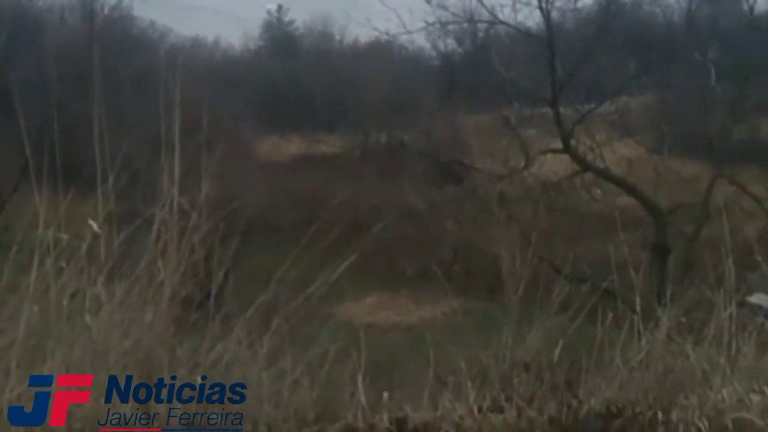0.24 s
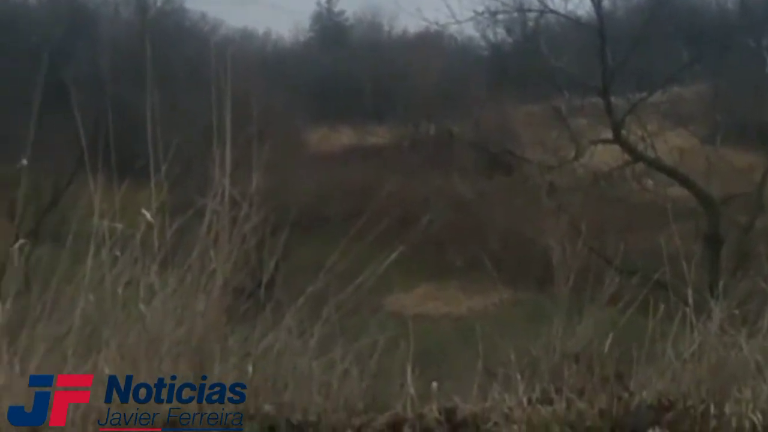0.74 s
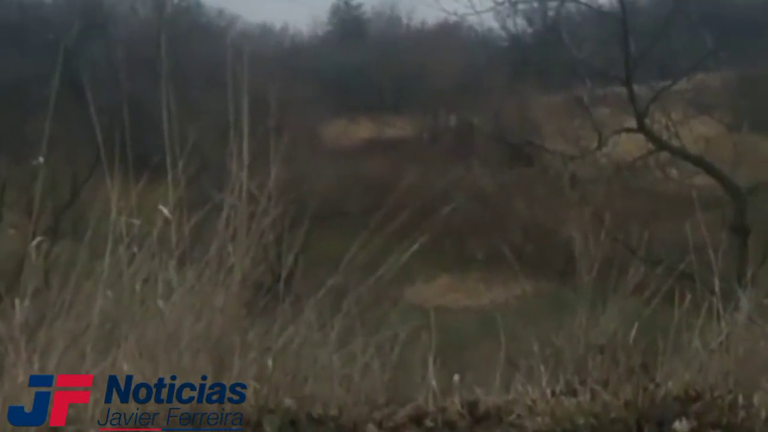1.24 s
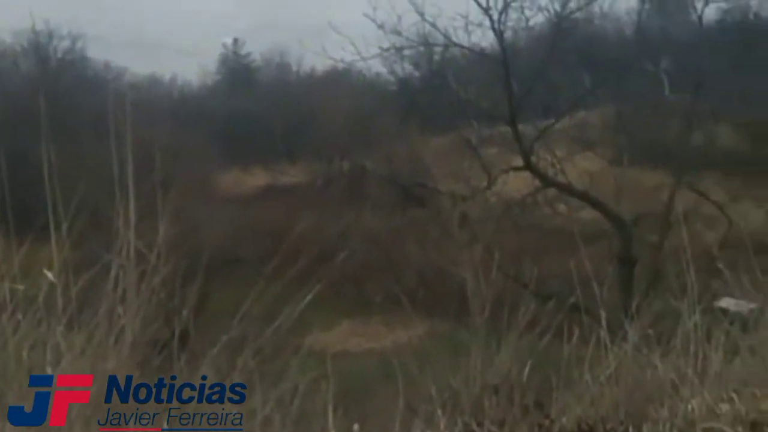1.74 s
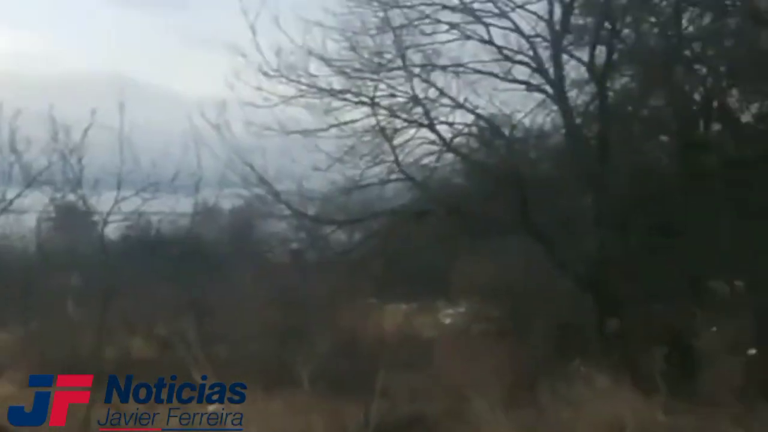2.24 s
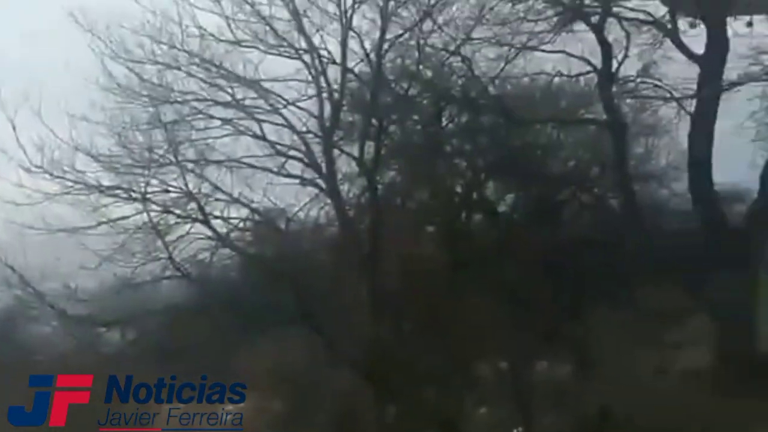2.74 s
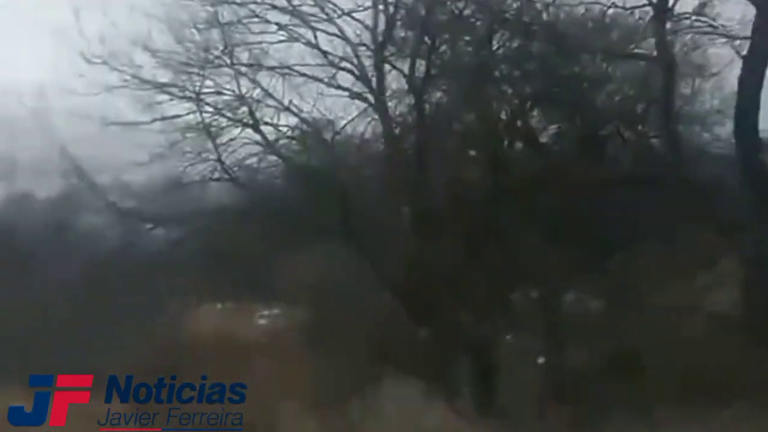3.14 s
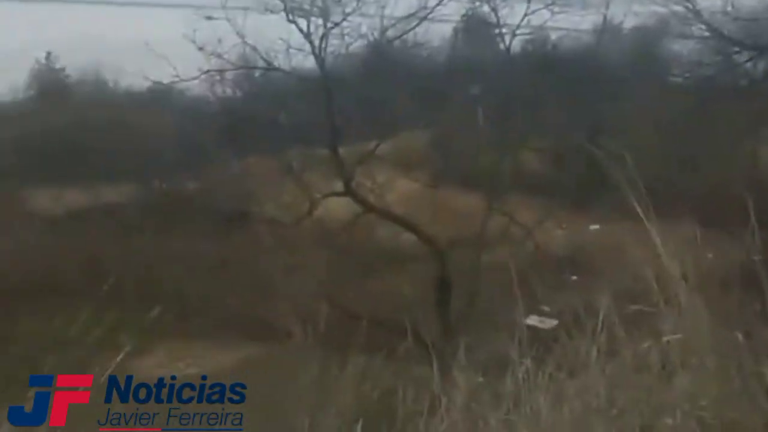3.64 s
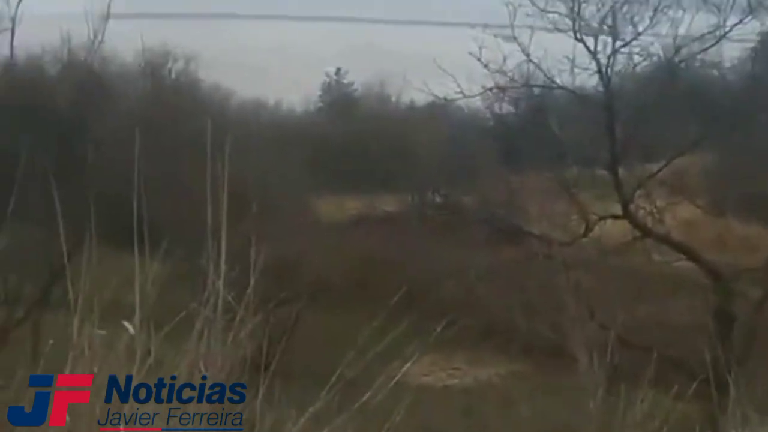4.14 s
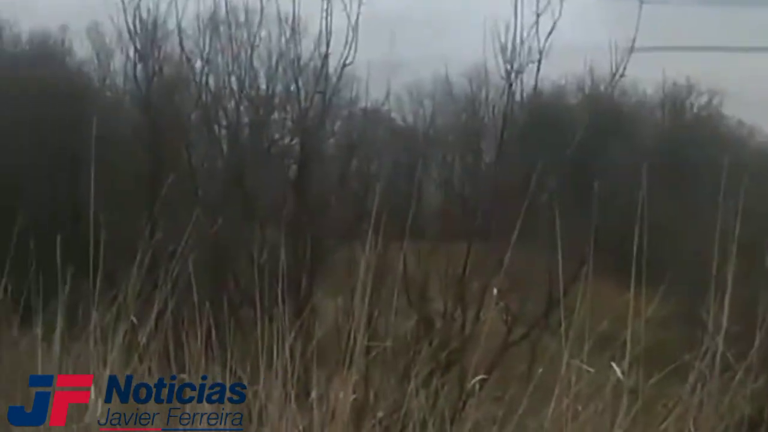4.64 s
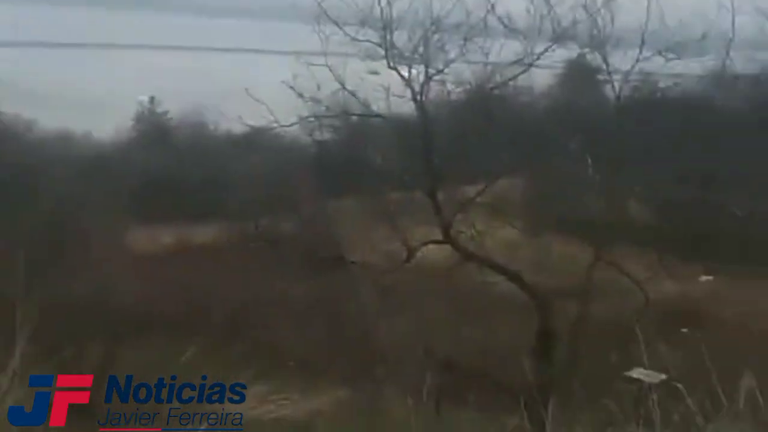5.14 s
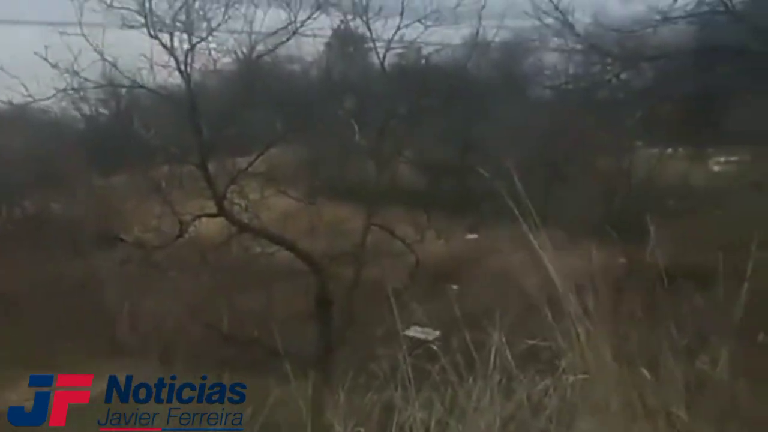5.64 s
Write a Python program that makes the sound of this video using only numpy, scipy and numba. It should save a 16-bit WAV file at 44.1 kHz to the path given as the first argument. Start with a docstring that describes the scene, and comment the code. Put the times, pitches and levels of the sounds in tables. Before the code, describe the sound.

A helicopter's main rotor slaps steadily and loudly, low over open scrubland, above a deep rumble. A nearer helicopter sweeps past in gusts of exhaust rush with a thin whine, its tail rotor buzzing and rattling as the hollow tone sinks. The rush then recedes, leaving the blade beat with sharp, uneven pops. A phone microphone slightly rounds off the loudest peaks.

```python
"""A helicopter's main rotor slaps steadily, low over scrubland, and the hillside repeats each slap.
Every blade gives a short sagging ring and a tip-vortex crack over a swelling rumble; some pop sharply.
A nearer helicopter sweeps past in gusts of exhaust rush, with hollow ground-reflection tones that sink
as it passes and a tail rotor that buzzes, rattles and chops the rush. Behind them sit a gearbox whine
and a few faint ticks, all heard through a phone that rounds off the loudest peaks."""
import sys
import numpy as np
from scipy import signal
from scipy.fft import rfft, irfft, next_fast_len
from scipy.io import wavfile
from scipy.ndimage import uniform_filter1d
from numba import njit

SR = 44100
rng = np.random.default_rng(int(sys.argv[2]) if len(sys.argv) > 2 else 0)


def to_wav(s):
    """Save 16-bit WAV."""
    ch = np.atleast_2d(s).T  # columns
    pcm = np.round(np.clip(ch, -1, 1) * 32767)  # PCM
    wavfile.write(sys.argv[1], SR, pcm.astype(np.int16))


N = 259308

# midrange colour of rushing air, for the exhaust wash and the blade crack: (frequency [Hz], gain [dB])
BODY_COLOUR = [(250, -14.5), (450, 6), (800, 6), (1100, -4.5), (1450, -9), (1800, -14), (2300, -31)]
# voice of the near helicopter: (time [s], hollow tone [Hz], second tone [Hz],
# second tone against the body [dB], tail buzz [dB], tail thump [dB])
NEAR_VOICE = [(0, 706, 1032, -6, -35, -22.5), (.4, 658, 1138, -12.5, -34, -58),
              (.7, 912, 1270, -11, -57, -25.5), (.86, 979, 1223, -7, -51, -27),
              (1.07, 811, 1296, -11.5, -53, -42), (1.12, 745, 1084, -3, -50, -43),
              (1.15, 799, 1243, -7, -50, -42), (1.2, 860, 1076, -3, -45, -37),
              (1.25, 721, 1204, -3.5, -41, -27), (1.29, 794, 1180, -4, -38, -28),
              (1.33, 878, 1227, -5.5, -32, -32), (1.39, 800, 1055, -9, -40, -30),
              (1.45, 767, 1013, -9, -47, -22), (1.53, 917, 1267, -17.5, -35, -33),
              (1.65, 783, 1240, -11, -26, -36), (1.82, 630, 1210, -11.5, -23.5, -40),
              (2, 601, 1205, -11.5, -19, -33.5), (2.2, 622, 1203, -9.5, -19, -38),
              (2.33, 620, 1176, -13, -17.5, -30.5), (2.45, 609, 1145, -8, -22, -25.5),
              (2.7, 521, 1010, -19.5, -24, -28.5), (2.82, 485, 1006, -13.5, -19, -28.5),
              (2.93, 467, 1018, -3, -16, -25), (3.1, 420, 942, -8, -20, -41.5),
              (3.5, 380.4, 858, -5.5, -21, -43.5), (4, 414, 910, -9, -21.5, -62),
              (4.6, 436, 837, -9.5, -25, -43.5), (4.95, 491, 880, -1, -48, -47.5),
              (5.15, 608, 916, -7.5, -42, -20.5), (5.88, 658, 1034, -16.5, -32, -30)]


def undb(db):
    """Decibels to amplitude."""
    return 10 ** (np.asarray(db) / 20)


def unit(x):
    """Scale to an rms of 1."""
    return x / np.sqrt(np.mean(x ** 2))


def curves(table):
    """The columns that follow a table's time column, one value a sample."""
    times, *columns = np.transpose(table)
    return [np.interp(np.arange(N) / SR, times, column) for column in columns]


def shape(x, points):
    """Colour x by (Hz, dB) points, cutting everything outside them."""
    size = next_fast_len(N)
    hz, db = np.transpose(points)
    bin_hz = np.arange(1, size // 2 + 2) * SR / size
    gain = undb(np.interp(np.log(bin_hz), np.log(hz), db, -120, -120))
    return irfft(rfft(x, size) * gain, size)[..., :N]


def spread(x, extra_db=0.):
    """Mid and side signals to left and right; the treble is widest."""
    # stereo width: (frequency [Hz], side against mid [dB])
    width = [(60, -40.5), (130, -39), (260, -28.5), (550, -23), (1200, -11.5), (2400, -6), (4000, -6.5),
             (11000, -2.5)]
    side = undb(extra_db) * shape(x[1], [(10, width[0][1])] + width + [(20000, width[-1][1])])
    return np.array([x[0] + side, x[0] - side])


def walk(rate):
    """Smooth random drift: levels held 1 / rate seconds and slewed twice."""
    hold = int(SR / rate)
    steps = np.repeat(rng.standard_normal(N // hold + 1), hold)
    return 2.17 * uniform_filter1d(uniform_filter1d(steps, hold), hold)[:N]


def noise(colour, flicker_db):
    """Coloured mid and side noise whose level flickers in the turbulent air."""
    return unit(shape(rng.standard_normal((2, N)), colour)) * undb(flicker_db * walk(12))


@njit
def bandpass(x, hz, width):
    """State-variable band-pass with a moving centre, gain 1 there; width is 1 / Q."""
    y, band, low = np.empty(len(x)), 0., 0.
    for i in range(len(x)):
        g = np.tan(np.pi * hz[i] / SR)
        v = (band + g * (x[i] - low)) / (1 + g * (g + width))
        band, low, y[i] = 2 * v - band, low + 2 * g * v, width * v
    return y


def hollow(hz, width):
    """Mid and side noise in one moving resonance; the air has taken its treble."""
    # treble lost over distance: (frequency [Hz], gain [dB])
    distance = [(10, 1), (1800, 1.5), (3500, -23.5), (6000, -37.5), (8000, -65)]
    dull = shape(rng.standard_normal((2, N)), distance)
    return unit(np.array([bandpass(bandpass(channel, hz, width), hz, width) for channel in dull]))


def via_ground(x, tone_hz, share):
    """Add a bounce that lags by one period of tone_hz: peaks at its multiples, notches between."""
    place = np.arange(N) - SR / tone_hz
    bounce = np.array([np.interp(place, np.arange(N), channel) for channel in x])
    return (x + share * bounce) / np.sqrt(1 + share ** 2)


def blades(t, blade_hz, scatter_db):
    """Seconds from the nearest blade passage, and a random strength for each passage."""
    count = t * blade_hz
    nearest = np.round(count).astype(int)
    strength = undb(scatter_db * rng.standard_normal(nearest.max() + 3))[nearest + 2]
    return (count - nearest) / blade_hz, uniform_filter1d(strength, size=200)


def pulse(age, hz):
    """A pressure peak between two troughs."""
    u = (np.pi * hz * age) ** 2
    return (1 - 2 * u) * np.exp(-u)


def ring(age, hz, decay_cycles):
    """A short ring that starts sharply and sags in pitch."""
    cycles = age * hz
    envelope = np.where(cycles < 0, np.exp(-(cycles / 0.42) ** 2), np.exp(-cycles / decay_cycles))
    sag = 1 - 0.18 * np.clip(cycles, -1, 4)
    return envelope * np.cos(2 * np.pi * cycles * sag)


def ticks():
    """Faint high ticks nearby: short bursts of narrow noise."""
    # one tick a row: (time [s], level [dB], pitch [Hz])
    bursts = [(3.4614, -48, 5750), (4.7686, -54, 5450), (5.7942, -66, 5530)]
    out, t = 0, np.arange(N) / SR
    for at, db, hz in bursts:
        gate = np.exp(-((t - at - .006) / 0.014) ** 2)
        band = shape(rng.standard_normal(N), [(0.89 * hz, -25), (hz, 0), (1.32 * hz, -25)])
        out = out + undb(db) * gate * unit(band)
    return out


def gearbox_whine():
    """A rasping band that narrows to a thin whine far off."""
    # the whine's glide: (time [s], pitch [Hz], level [dB])
    glide = [(.42, 2390, -64), (.53, 2390, -30), (.63, 2356, -23), (.715, 2430, -15.5), (.78, 2320, -30),
             (.85, 2585, -18), (.89, 2390, -42), (1.035, 2405, -52), (1.1, 2610, -25), (1.3, 2500, -27),
             (1.6, 2480, -38), (2.1, 2346, -42), (2.8, 2240, -53), (2.95, 2277, -39.5), (3.3, 2190, -58.5),
             (5.2, 2190, -55.5), (5.45, 2210, -54), (5.7, 2185, -48), (5.88, 2195, -52)]
    # broad rasp in the whine: (time [s], share of the power [0-1])
    rasp_share = [(0, 1), (3, .85), (5.2, .05), (5.88, .05)]
    hz, db = curves(glide)
    share = curves(rasp_share)[0]
    rasp, thin = hollow(hz, width=.2), hollow(hz, width=.03)
    return spread(undb(db) * (np.sqrt(share) * rasp + np.sqrt(1 - share) * thin))


def swish_lift(attack_s=0.0052):
    """Lift in dB that briefly brightens the rush: a quick rise, then a fade."""
    # one swish a row: (time [s], fade [s], treble lift [dB])
    swishes = [(1.326, 0.018, 3), (1.762, 0.041, 9), (2.708, 0.018, 12.5), (3.168, 0.012, 8),
               (3.289, 0.037, 11.5)]
    t = np.arange(N) / SR
    return sum(db * np.exp(-np.where(t < at, (at - t) / attack_s, (t - at) / fade_s) ** 2)
               for at, fade_s, db in swishes)


def exhaust_rush(wander=0.044):
    """Gusts of exhaust noise, hollowed by the ground reflection into tones that turbulence bends."""
    # the gusts: (time [s], hiss [dB], body [dB], treble [dB])
    gusts = [(0.0, -43, -29, -44), (0.08, -25.5, -18.5, -39), (0.13, -35.5, -27.5, -46.5),
             (0.36, -36.5, -22, -46.5), (0.47, -42, -25.5, -48), (0.51, -28, -20.5, -43),
             (0.62, -30, -20, -38), (0.66, -29, -13.5, -32), (0.715, -26, -11.5, -24),
             (0.77, -29, -14.5, -32.5), (0.815, -20, -14.5, -29.5), (0.855, -19, -8, -22),
             (0.866, -24, -12.5, -27), (0.876, -31, -22.5, -35), (0.895, -34, -29, -39),
             (0.93, -43, -29, -48), (1.035, -41, -28.5, -45.5), (1.055, -20.5, -20, -34),
             (1.078, -21, -10.5, -27.5), (1.125, -21.5, -9.5, -24), (1.19, -21.5, -13, -26.5),
             (1.28, -19.5, -10.5, -23), (1.34, -20, -10.5, -24.5), (1.46, -23, -13.5, -32),
             (1.52, -16.5, -9, -24.5), (1.59, -28, -15.5, -36), (1.62, -21, -11, -34),
             (1.72, -24, -18.5, -38.5), (1.82, -32.5, -16.5, -40), (1.875, -21.5, -13.5, -38),
             (1.94, -37, -16, -37), (2.02, -30.5, -16, -36.5), (2.11, -36.5, -16, -39.5),
             (2.2, -33, -17, -36), (2.36, -31.5, -18, -39.5), (2.46, -35, -20.5, -45.5),
             (2.55, -30.5, -14.5, -38.5), (2.65, -37.5, -15.5, -52), (2.73, -48, -21, -51.5),
             (2.85, -40, -20, -45.5), (2.89, -33, -17, -40.5), (2.95, -30, -17.5, -44.5),
             (2.99, -34, -20.5, -45), (3.1, -38.5, -20, -49.5), (3.26, -37, -23, -48.5),
             (3.31, -44.5, -20, -46), (3.35, -45, -22.5, -45), (3.4, -46.5, -24.5, -50),
             (3.5, -47, -23.5, -52), (3.75, -51.5, -25, -53), (4, -50, -22, -51.5),
             (4.3, -50.5, -26.5, -59), (4.68, -50.5, -26, -58), (4.78, -51, -24, -52),
             (4.91, -49.5, -31, -63), (5.19, -45, -24, -55), (5.85, -49.5, -29.5, -61),
             (5.88, -57, -27, -66)]
    # colours of the three upper bands: (frequency [Hz], gain [dB])
    hiss_colour = [(1100, -12.5), (1450, 3), (1750, 0.5), (2050, 2.5), (2500, 0), (2900, -3.5), (3600, -24),
                   (4500, -38)]
    treble_colour = [(2600, -4.5), (3400, -0.5), (4600, -6.5), (5200, -9), (5800, -10), (6400, -23),
                     (7200, -31)]
    air_colour = [(5500, -24), (6600, -2), (9000, -7), (11000, -12), (11400, -21.5)]
    hiss_db, body_db, treble_db = curves(gusts)
    tone_hz, second_hz, second_db, _, _ = curves(NEAR_VOICE)
    third_hz = 2 * second_hz - tone_hz  # ground peaks are evenly spaced
    first = undb(-2.5) * hollow(tone_hz * (1 + wander * walk(14)), width=0.57)
    third = undb(-10.5) * hollow(third_hz * (1 + wander * walk(14)), width=0.16)
    second = hollow(second_hz * (1 + wander * walk(14)), width=0.25)
    wash = undb(-10) * via_ground(noise(BODY_COLOUR, flicker_db=3.0), tone_hz, share=0.22)
    lift_db = swish_lift()
    body = undb(body_db + 0.57 * lift_db) * (first + undb(second_db) * (second + third) + wash)
    hiss = via_ground(noise(hiss_colour, flicker_db=1.5), tone_hz, share=0.23)
    hiss *= undb(hiss_db + 0.81 * lift_db)
    treble = undb(treble_db + lift_db) * noise(treble_colour, flicker_db=0.9)
    air_db = 5.5 + 1.837 * treble_db + 1.1 * lift_db  # the top band dies fastest as the treble drops
    air = undb(air_db) * noise(air_colour, flicker_db=1.0)
    slope_hz = tone_hz / 3.6 * (1 + .04 * walk(6))  # a longer bounce, off the slope
    return via_ground(body + hiss + treble + air, slope_hz, share=0.38)


def tail_buzz(age, strength, width=.26):
    """Each tail blade clicks through the hollow tone's resonance, over a low thump."""
    tone_hz, _, _, buzz_db, thump_db = curves(NEAR_VOICE)
    click = strength * pulse(age + 0.002003, hz=750.0)
    buzz = undb(buzz_db) * unit(bandpass(bandpass(click, tone_hz, width), tone_hz, width))
    thump = undb(thump_db) * unit(pulse(age, hz=111.0))
    return (buzz - thump) * [[1], [.5]]  # mid, side


def tail_rattle(age, strength, peak_s=2.2, rise_db_per_s=12, fall_db_per_s=18.5):
    """Tail blades crack unevenly in the treble, each a noise burst and a snap; it peaks, then fades."""
    # colour of the rattle: (frequency [Hz], gain [dB])
    colour = [(700, -24), (1200, 8), (2500, 1), (4500, -11), (6200, -19.5), (7000, -30.5), (10500, -40)]
    # blades that crack harder than the rest: (time [s], boost [dB])
    hard_cracks = [(1.865, 4), (1.966, 5), (2.015, 5), (2.065, 0.5), (2.113, 1), (2.146, 12.5), (2.196, 4),
                   (2.212, 7), (2.262, 9.5), (2.311, 10), (2.328, 2.5), (2.359, 8.5), (2.376, 6),
                   (2.459, 6), (2.573, 8)]
    t = np.arange(N) / SR
    level_db = -35 - np.maximum(rise_db_per_s * (peak_s - t), fall_db_per_s * (t - peak_s))
    level_db += sum(db * np.exp(-((t - at) / .005) ** 4) for at, db in hard_cracks)
    burst = unit(strength * np.exp(-(age / 0.0018) ** 2) * noise(colour, flicker_db=1.5))
    snap = unit(shape(strength * np.exp(-(age / .00006) ** 2), colour))
    return undb(level_db) * (burst + undb(-5) * snap * [[1], [.7]])


def near_helicopter(tail_hz=60.5, throb=0.31, speed_m_s=35, pass_s=2.2, closest_m=49):
    """The fly-by: the tail rotor buzzes through the exhaust rush and chops it as the image widens."""
    # travel time of the tail blade pulses, shortest around the pass: (time [s], delay [ms])
    tail_path = [(0, 47), (1.4, 24), (1.8, 17.8), (2, 14.7), (2.2, 13.3), (2.6, 10.9), (2.75, 11.7),
                 (2.9, 15), (3.2, 25), (3.4, 32.5), (3.6, 44), (5.88, 200)]
    # the image swings as the phone turns: (time [s], left minus right [dB])
    pan = [(0, -4), (1.1, -0.6), (1.7, -2), (2.3, -2), (3.1, -2.5), (3.5, -6.5), (4.95, -6.5), (5.15, 4.5),
           (5.5, 0), (5.88, -1.5)]
    t = np.arange(N) / SR
    age, strength = blades(t - curves(tail_path)[0] / 1000, tail_hz, scatter_db=1.8)
    chop = 1 + throb * strength * np.exp(-(age / 0.0071) ** 2)
    chop /= np.sqrt(uniform_filter1d(chop ** 2, size=2400))  # chopping keeps the running level
    rush = exhaust_rush() * chop
    tail = tail_rattle(age, strength) + tail_buzz(age, strength)
    gusting = undb(0.6 * walk(9))
    along_m = speed_m_s * (t - pass_s)
    away = along_m / np.hypot(along_m, closest_m)  # -1 coming, 1 leaving
    stereo = spread(gusting * rush + tail, extra_db=1.8 + 3.5 * away)
    pan_db = curves(pan)[0]
    return stereo * undb(np.array([pan_db, -pan_db]) / 2)


def blade_pops(rise_cycles=1.6, fall_cycles=3.8):
    """Single sharper blade pops, each ringing for a few cycles."""
    # one pop a row: (time [s], peak [dB], ring [Hz])
    pops = [(.036, -10, 126), (3.057, -34, 417.5), (3.383, -14.5, 220), (3.432, -17.5, 230),
            (3.498, -18, 896), (3.543, -10.5, 422), (3.593, -15, 900), (3.597, -8.5, 384),
            (3.667, -10.5, 400), (3.712, -8, 212), (3.769, -12, 214), (3.797, -19, 906), (3.88, -26, 1350),
            (3.914, -10.5, 426), (3.99, -12.5, 915), (4.17, -10, 435), (4.263, -30, 1290),
            (4.424, -27, 1030), (4.427, -10, 394), (4.483, -21, 1290), (4.485, -11.5, 550),
            (4.554, -11, 442), (4.703, -26, 1250), (4.761, -25, 770), (4.815, -14, 567),
            (4.875, -12.5, 235), (5.041, -15.5, 557), (5.099, -18.5, 340), (5.098, -24.5, 1390),
            (5.122, -15.5, 430), (5.152, -13.5, 680), (5.262, -13, 760), (5.316, -14, 730),
            (5.429, -18.5, 644), (5.518, -22, 677), (5.597, -10, 670), (5.654, -16.5, 724),
            (5.764, -14, 676), (5.821, -9.5, 694)]
    out, t = 0, np.arange(N) / SR
    for at, db, hz in pops:
        cycles = (t - at - 0.00221) * hz  # counted from the envelope's peak
        envelope = np.exp(-(cycles / np.where(cycles < 0, rise_cycles, fall_cycles)) ** 2)
        out = out + undb(db) * envelope * np.sin(2 * np.pi * cycles)
    return out


def rotor_rumble(age, strength, level_db, pitch_hz):
    """A boom and a hollow rumble that swell with each main blade, over a deep drone."""
    # colours of the boom and the drone: (frequency [Hz], gain [dB])
    boom_colour = [(60, -27.5), (85, -21), (110, 3.5), (140, -4), (220, -5.5), (330, -5), (450, -12),
                   (700, -11)]
    drone_colour = [(15, -18), (30, -14), (48, -7), (60, -1), (80, 0), (110, -9.5)]
    # the 110 Hz boom: (time [s], level against the rumble [dB])
    boom_level = [(0, -5.5), (1.1, -2.5), (1.6, -12), (2.5, -6), (3.3, -12.5), (4, -12.5), (4.8, -9),
                  (5.3, -5.5), (5.88, -2)]
    # the drone: (time [s], level [dB])
    drone_level = [(0.0, -29), (0.03, -19), (0.52, -35), (1.01, -24), (1.33, -60), (1.37, -27.5),
                   (2.31, -35.5), (2.42, -20.5), (2.62, -36.5), (3.0, -24), (3.08, -29), (4.24, -37.5),
                   (4.47, -25), (4.99, -36), (5.17, -26.5), (5.34, -39.5), (5.45, -22), (5.88, -26.5)]
    swell = uniform_filter1d(0.8 + 0.72 * strength * np.exp(-((age - .005) / 0.011) ** 2), size=300)
    boom = undb(curves(boom_level)[0]) * noise(boom_colour, flicker_db=1.5)
    rumble = undb(-4.5) * hollow(pitch_hz, width=0.8)
    drone = undb(curves(drone_level)[0]) * noise(drone_colour, flicker_db=1.5)
    return undb(level_db) * swell * (boom + rumble) + drone


def main_rotor(blade_hz=18.15, echo_ms=7, echo_ms_per_s=.85):
    """Each blade gives a crack, a slap and a hillside echo that lags ever more, over the rumble."""
    # the rumble, which the slap follows in level and pitch: (time [s], level [dB], pitch [Hz])
    rotor_voice = [(0.0, -17.5, 189.4), (0.03, -20.5, 168), (0.08, -21, 185), (0.59, -18, 197.5),
                   (0.72, -26, 198), (0.98, -16.5, 178.5), (1.15, -23, 227.5), (1.18, -23, 187),
                   (1.36, -21.5, 251), (1.46, -17.5, 174), (1.51, -23.5, 209), (1.8, -17, 261),
                   (1.93, -18.5, 219), (2.54, -14, 181), (2.59, -22, 210), (2.83, -15, 163.5),
                   (3.05, -17.5, 240), (3.75, -16.5, 203), (4.03, -18.5, 235), (4.11, -15, 196),
                   (4.67, -17.5, 189), (4.9, -18, 202.4), (4.98, -19, 204), (5.42, -18.5, 179),
                   (5.76, -19, 187.7), (5.88, -23.5, 182)]
    # travel time of the slaps: (time [s], delay [ms])
    slap_path = [(0, 40), (.3, 37.3), (.6, 34), (1, 26.2), (1.3, 22.5), (1.7, 18.4), (2.3, 14.5), (3, 19),
                 (4, 25.3), (4.8, 30.2), (5.88, 38)]
    # the slap arrives without its deepest bass or any edge: (frequency [Hz], gain [dB])
    slap_colour = [(20, -25), (70, -10), (140, -1), (700, 6.5), (1600, -35)]
    # fader for slap, echo and crack: (time [s], gain over the rumble [dB])
    slap_level = [(0, 13.5), (.6, 9), (1, 11), (2, -3.5), (3, 1.5), (3.5, 2), (3.95, 5), (4.3, 4.5),
                  (4.9, 7), (5.3, 4.5), (5.88, 7.5)]
    # blades that slap harder than the rest: (time [s], boost [dB])
    hard_slaps = [(.036, 6), (.1, 3.5), (.155, 3), (.315, 2.5), (.43, 1.5), (.485, -0.5), (.59, 1.5),
                  (.97, 3), (3.44, 0.5), (3.712, 6.5), (3.77, 3.5), (4.268, 4), (4.325, 4), (4.712, 2),
                  (4.767, 10.5), (4.879, 4.5), (5.101, 10), (5.156, 5.5), (5.6, 6.5)]
    # the hillside echo: (time [s], level against the slap [dB])
    echo_level = [(0, -4.5), (.3, 3.5), (.7, 5.5), (1.2, 1.5), (3, -5), (4.8, -8.5), (5.88, -8)]
    rumble_db, rumble_hz = curves(rotor_voice)
    t = np.arange(N) / SR
    rotor_t = t - curves(slap_path)[0] / 1000
    echo_t = rotor_t - (echo_ms + echo_ms_per_s * t) / 1000
    age, strength = blades(rotor_t, blade_hz, scatter_db=1.8)
    echo_age, echo_strength = blades(echo_t, blade_hz, scatter_db=2.0)
    slap_hz = 0.91 * rumble_hz
    slap = strength * ring(age, slap_hz, decay_cycles=0.54)
    echo = undb(curves(echo_level)[0]) * echo_strength * ring(echo_age, slap_hz, decay_cycles=0.49)
    slaps = shape(slap + echo, slap_colour) * [[1], [.4]]  # mid, side
    # the tip vortex adds a few cycles of midrange noise just ahead of the peak
    crack_gate = strength * np.exp(-((age + 0.0063) / 0.0072) ** 2)
    crack = undb(-17) * crack_gate * noise(BODY_COLOUR, flicker_db=2.0)
    accent_db = sum(db * np.exp(-((t - at - .005) / .018) ** 4) for at, db in hard_slaps)
    slap_gain = undb(rumble_db + curves(slap_level)[0] + accent_db)
    return spread(rotor_rumble(age, strength, rumble_db, rumble_hz) + slap_gain * (crack - slaps))


def scene():
    """Both helicopters and the faint ticks, in stereo."""
    return main_rotor() + near_helicopter() + blade_pops() + gearbox_whine() + ticks()


def record(dry, low_cut_hz=20, ceiling=.98, top_hz=11330):
    """The phone drops the deepest bass, rounds off the loudest peaks and cuts the top."""
    trimmed = signal.sosfilt(signal.butter(1, low_cut_hz, "high", fs=SR, output="sos"), dry)
    held = trimmed / (1 + np.abs(trimmed / ceiling) ** 4) ** .25
    return signal.sosfilt(signal.ellip(12, .2, 80, top_hz, fs=SR, output="sos"), held)


dry = scene()
out = record(dry)
to_wav(out)
```